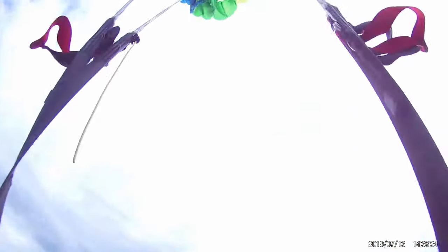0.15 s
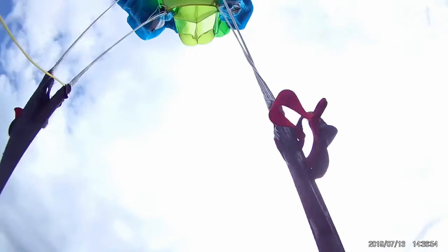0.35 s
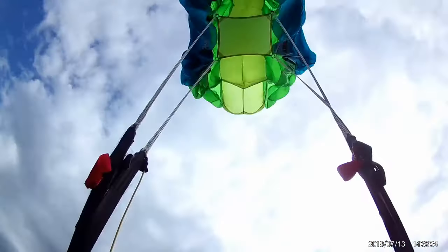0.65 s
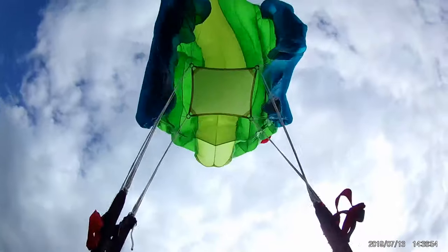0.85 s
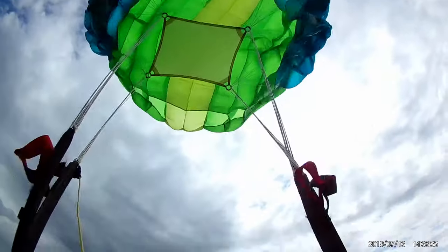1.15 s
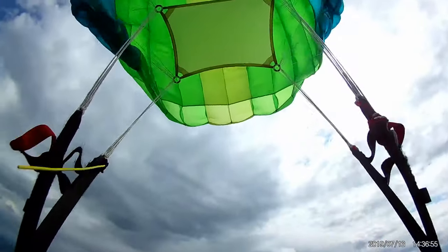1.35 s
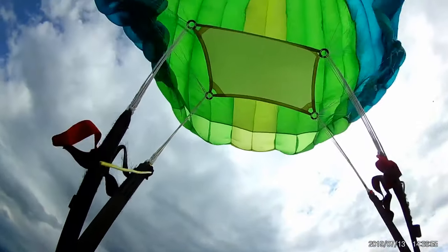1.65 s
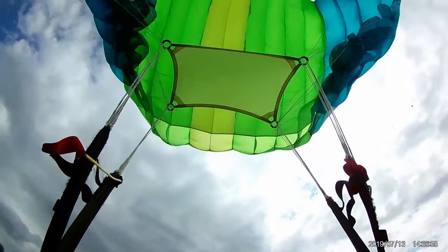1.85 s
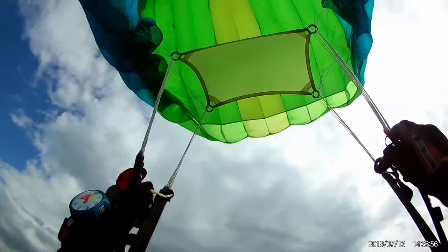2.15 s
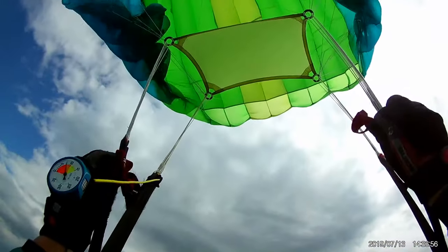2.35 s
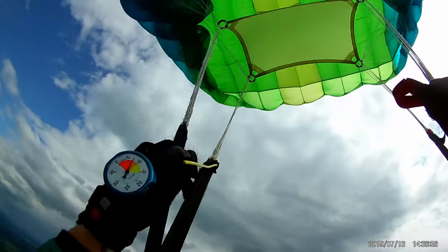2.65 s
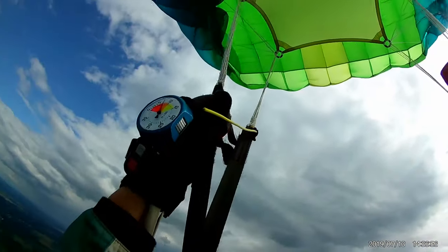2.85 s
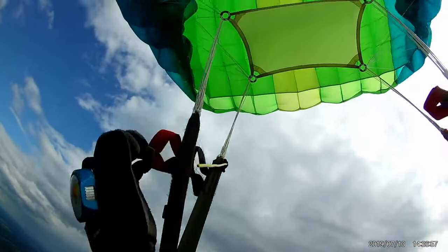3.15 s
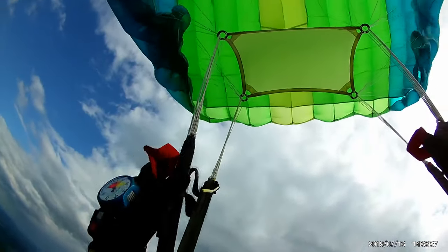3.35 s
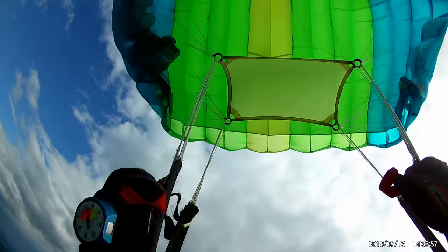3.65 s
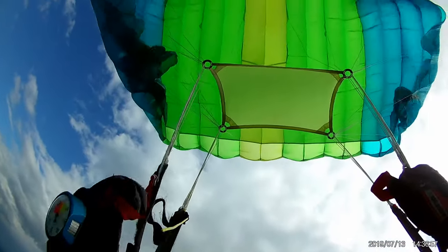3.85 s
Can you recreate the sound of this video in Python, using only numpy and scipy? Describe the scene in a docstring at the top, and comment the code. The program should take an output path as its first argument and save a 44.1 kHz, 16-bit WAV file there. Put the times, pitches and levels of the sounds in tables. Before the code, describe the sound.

Loud wind roars on a helmet microphone and dies within a quarter second as a parachute opens, with a sharp fabric snap at 0.1 seconds. The cloth flaps, jerks taut again around 0.6 seconds, and flutters faintly until about 2 seconds. Low buffeting thumps gradually thin out. From about 1.6 seconds a quieter, steady airstream continues to the end at 4 seconds, with a faint whistle from the cords.

```python
"""A ragged blast of free-fall wind roars at a helmet camera and dies within a quarter second as a
parachute opens. The filling canopy flutters, cracks and twice jerks taut. Eddies strike the microphone
as low thumps, thinning as the fall slows, and a steady airstream rings the resonances of the housing.
As the cloth spreads, air sounds a hollow in the gear; then the lines sing softly over a faint
flickering hiss."""
import sys
import numpy as np
from scipy.fft import rfft, irfft, next_fast_len
from scipy.io import wavfile
from scipy.ndimage import map_coordinates

SR = 44100
rng = np.random.default_rng(int(sys.argv[2]) if len(sys.argv) > 2 else 0)


def master_out(mix):
    """Clip the mix to full scale and print it as 16-bit PCM to the path in sys.argv[1]."""
    frames = np.transpose(np.atleast_2d(mix))
    ceiling = np.clip(frames, -1, 1)
    pcm = np.round(ceiling * 32767).astype(np.int16)
    wavfile.write(sys.argv[1], SR, pcm)


N = 176400

# resonances of the housing, and one that the blast drives harder: centre_hz, width_hz, gain_db
HOUSING_MODES = [(206, 22, -16), (368.6, 36, -3), (422, 34, -19), (509, 41, -6.5), (647.3, 27, 1.5),
                 (894, 37, -6), (1150, 20, -12), (1302, 55, -3), (1447, 14, -1.5), (1716, 36, -6.5),
                 (1890, 51, 1), (2860, 55, -12)]
BLAST_MODES = [(363.5, 14, 1.5)]
# envelopes of the blast, the buffeting and the cavity tone: time_s, relative_level_db
BLAST_LEVEL = [(0, -9), (.06, -13.5), (.09, -9.5), (.14, -14.5), (.185, -23.5), (.205, -22), (.235, -36.5),
               (.4, -68)]
BUFFET_LEVEL = [(0, -3.5), (.07, -16.5), (.2, -11.5), (.3, -17), (.52, -18), (.59, -23.5), (.68, -22),
                (.75, -28.5), (.95, -31.5), (1.12, -28), (1.23, -34), (1.39, -30.5), (1.75, -33.5),
                (2.05, -32), (2.22, -35.5), (2.62, -34), (2.8, -37.5), (3.7, -36.5), (4.0, -35.5)]
HOLLOW_LEVEL = [(.85, -57.5), (1.03, -63), (1.08, -54), (1.2, -54), (1.275, -44), (1.33, -44), (1.4, -60),
                (1.6, -70)]
# envelopes of the airstream's two bands: time_s, relative_rush_db, relative_hiss_db
STREAM_LEVELS = [(0, -36, -24.5), (.3, -25.5, -33.5), (.41, -35, -36.5), (.48, -24.5, -36.5),
                 (.57, -32.5, -35), (.64, -31, -32), (.76, -36.5, -38.5), (.88, -35, -37), (.98, -41, -40),
                 (1.08, -38.5, -35), (1.23, -42.5, -35.5), (1.35, -35, -38), (1.42, -36.5, -39),
                 (1.6, -37, -37.5), (1.64, -44.5, -44), (1.7, -47, -47.5), (1.82, -46.5, -46),
                 (1.87, -40.5, -41.5), (2.06, -39.5, -41), (2.15, -43, -44.5), (2.3, -43, -45.5),
                 (2.48, -41, -40.5), (2.78, -43.5, -44.5), (2.87, -41.5, -42), (3.15, -40, -41.5),
                 (3.3, -43, -44), (3.5, -41, -42.5), (3.68, -45, -46.5), (4.0, -47, -48.5)]
# noise spectra ahead of the housing: frequency_hz, relative_density_db
BLAST_SPECTRUM = [(70, -20.5), (140, -3), (200, -0.5), (290, -3.5), (450, -3.5), (620, -13), (1000, -10.5),
                  (1290, -9), (1600, -11.5), (2000, -15), (2600, -25), (3000, -22.5), (3900, -26.5),
                  (4900, -38.5), (6000, -33), (7300, -45.5), (9300, -52), (11000, -64.5)]
BUFFET_SPECTRUM = [(12, -30), (25, -13), (42, -9), (68, 0.5), (95, -7), (130, -12), (200, -25.5),
                   (400, -36), (900, -103.5)]
CRACK_SPECTRUM = [(60, -9.5), (200, 4.5), (380, 3), (800, -12), (1350, -4), (2000, -9.5), (2600, -18.5),
                  (3800, -18.5), (5000, -30.5), (6500, -32), (8000, -59.5), (10000, -68.5)]
FLICKER_SPECTRUM = [(2500, -28), (4000, 3), (6000, 4), (7400, -19.5), (9000, -2), (11000, -31)]
# airstream spectra before and after the canopy spreads: frequency_hz, relative_density_db
RUSH_EARLY = [(70, -33), (150, 8.5), (220, 2), (290, 1), (360, 0.5), (480, -0.5), (560, -7.5), (680, -10.5),
              (800, -11.5), (1100, -24), (2000, -76)]
RUSH_LATE = [(70, -21), (150, 3), (220, 0), (290, -1), (360, -1), (490, 1), (560, -4.5), (650, -2),
             (780, -6.5), (1000, -18.5), (2000, -54.5)]
HISS_EARLY = [(450, -31), (800, -11.5), (1050, -8.5), (1300, -0.5), (1500, -9.5), (1900, -7.5), (2250, -7),
              (2600, -23), (3080, -11.5), (3500, -25), (3900, -17), (4900, -29.5), (5900, -31), (7200, -45),
              (8200, -67.5), (11000, -69.5)]
HISS_LATE = [(450, -27), (800, -9), (1000, -10), (1300, 0), (1600, -4.5), (1950, -5), (2200, -9),
             (2600, -20), (3080, -10), (3550, -18.5), (4100, -19.5), (4500, -28.5), (5200, -31),
             (5900, -21.5), (6600, -34), (7200, -30.5), (8000, -62), (11000, -69.5)]
# big eddies striking the microphone: start_s, envelope_peak_db, pitch_hz
EDDY_THUMPS = [(.002, -2.5, 67), (.16, -7, 67), (0.327, -11.5, 56), (0.368, -4, 84.5), (.478, -15, 102),
               (0.64, -9, 68.6), (0.664, -12.5, 68.5), (.806, -18.5, 76), (0.883, -13.5, 66),
               (0.912, -19.5, 65), (1.051, -20, 83), (1.278, -16.5, 65), (1.337, -22, 78.4),
               (1.44, -25, 76), (1.508, -18.5, 72), (1.598, -23, 64.6), (1.68, -27, 83), (1.755, -30.5, 55),
               (1.948, -26, 77.5), (2.031, -31, 69), (2.3, -32, 97), (2.521, -27, 78), (2.598, -38, 72),
               (2.646, -24, 78), (3.95, -27.5, 75)]
# flaps of the filling canopy: peak_s, level_db, rise_s, decay_s
CANOPY_CRACKS = [(0.094, -14, 0.011, 0.0097), (.174, -13.5, 0.0021, 0.0032), (0.206, -17, 0.0044, .012),
                 (0.268, -25, .009, 0.0074), (.32, -36, 0.0052, 0.0093), (0.38, -27.5, 0.0079, 0.0098),
                 (0.475, -27.5, 0.01, 0.018), (0.633, -22.5, .011, 0.012), (.693, -27, 0.0076, 0.009),
                 (1.123, -38.5, 0.0028, 0.013), (1.283, -29, 0.0026, 0.0072), (1.792, -32, 0.0014, 0.0089),
                 (1.873, -35.5, 0.0066, 0.016)]
# pressure pulses as the cloth jerks fully taut: start_s, peak_db
CANOPY_SNAPS = [(0.0881, 0), (.632, -13.5)]
# whistles of the taut suspension lines: pitch_hz, half_width_hz, level_re_hiss_db
LINE_TONES = [(2080, 5.4, -17.5), (3700, 12, -33), (4920, 40, -33.5)]
# spectral shape of the stereo side signal: frequency_hz, gain_db
SIDE_SPECTRUM = [(150, -78), (400, -52.5), (750, -23), (1400, -22.5), (4000, -25), (7000, -28.5)]
# further gain on the side signal, falling as the air slows: time_s, gain_db
SIDE_FADE = [(0, -4.5), (.25, 2.5), (.7, -4), (1.3, -13), (1.7, -15), (2.3, -30)]

SPREAD_START_S, SPREAD_END_S = 1.08, 1.81  # the canopy spreads
FLUTTER_HZ, FLUTTER_DB, RIPPLE_HZ, RIPPLE_DB = 53.4, 0.52, 194.9, 1.15  # flapping cloth, finer ripple


def amp(db):
    """Amplitude ratio of a level in decibels."""
    return 10 ** (np.asarray(db) / 20)


def unit(x):
    """Normalisation to an rms of 1."""
    return x / np.sqrt(np.mean(x ** 2) + 1e-20)


def gain_at(spectrum, hz):
    """Amplitude response, interpolated in decibels on a logarithmic frequency axis."""
    points_hz, points_db = np.transpose(spectrum)
    return amp(np.interp(np.log(hz + 1), np.log(points_hz + 1), points_db))


def curves(rows):
    """Linear interpolation, sample by sample, of each column after the time."""
    times_s, *columns = np.transpose(rows)
    return [np.interp(np.arange(N) / SR, times_s, column) for column in columns]


def wobble(rate_hz):
    """Smooth random modulation: a spline through rate_hz Gaussian values a second."""
    return map_coordinates(rng.standard_normal(4096), [np.arange(N) * rate_hz / SR], mode="mirror")


def pulse(u):
    """A smooth pulse that rises from 0, peaks at u = 1 and decays."""
    return (u * np.exp(1 - u)) ** 2


def filtered(x, response):
    """Linear filtering: the spectrum of x is multiplied by a frequency response."""
    size = next_fast_len(N + SR // 2)
    return irfft(rfft(x, size) * response(np.fft.rfftfreq(size, 1 / SR)), size)[..., :N]


def ringing(x, modes):
    """Forced resonance: the responses of damped modes add to the sound that drives them."""
    def response(hz):
        return 1 + sum(amp(db) * 1j * hz * width / (centre ** 2 - hz ** 2 + 1j * hz * width)
                       for centre, width, db in modes)
    return filtered(x, response)


def turbulence(spectrum):
    """Random pressure of rms 1, coloured by its spectrum and by resonance in the housing."""
    noise = filtered(rng.standard_normal(N), lambda hz: gain_at(spectrum, hz))
    return unit(ringing(noise, HOUSING_MODES))


def free_fall_blast():
    """Turbulent noise falls with airspeed, so the ragged roar collapses as the canopy catches."""
    level_db, = curves(BLAST_LEVEL)
    roughness = amp(2.3 * wobble(170))
    return amp(level_db) * unit(roughness * ringing(turbulence(BLAST_SPECTRUM), BLAST_MODES))


def buffeting():
    """Pressure fluctuations of eddies on the microphone make a rumble, mostly below 140 Hz."""
    level_db, = curves(BUFFET_LEVEL)
    unevenness = amp(0.14 * wobble(20))
    return amp(level_db - 1.63) * unit(unevenness * turbulence(BUFFET_SPECTRUM))


def airstream(rush_db, hiss_db, spread):
    """Amplitude modulation by the fluttering cloth is common to low rush, hiss and singing lines."""
    def crossfade(early, late):  # equal power
        return np.sqrt(1 - spread) * turbulence(early) + np.sqrt(spread) * turbulence(late)
    flutter = unit(amp(FLUTTER_DB * wobble(FLUTTER_HZ) + RIPPLE_DB * wobble(RIPPLE_HZ)))
    rush = amp(rush_db - 1.02 + 0.56 * wobble(29.4)) * crossfade(RUSH_EARLY, RUSH_LATE)
    hiss_gain = amp(hiss_db - 2.5 + 0.12 * wobble(23.8))
    hiss = hiss_gain * (crossfade(HISS_EARLY, HISS_LATE) + spread * singing_lines())
    return flutter * (rush + hiss)


def eddy_thumps(rise_s=0.011):
    """Each big eddy is a pressure transient that swells and dies within a few low cycles."""
    out = np.zeros(N + SR)
    t = np.arange(SR // 5) / SR
    envelope = pulse(t / rise_s)
    for start_s, peak_db, pitch_hz in EDDY_THUMPS:
        out[round(start_s * SR):][:len(t)] += amp(peak_db) * envelope * np.sin(2 * np.pi * pitch_hz * t)
    return out[:N]


def canopy_cracks(roughness_db=3.5):
    """Accelerating cloth radiates: each flap is a noise burst with exponential rise and decay."""
    t = np.arange(N) / SR
    envelope = sum(amp(level_db) * np.exp(-np.maximum((peak_s - t) / rise_s, (t - peak_s) / decay_s))
                   for peak_s, level_db, rise_s, decay_s in CANOPY_CRACKS)
    roughness = amp(roughness_db * np.tanh(wobble(320)))
    return envelope * unit(roughness * turbulence(CRACK_SPECTRUM))


def canopy_snaps(rise_s=0.0008):
    """Impulse excitation: cloth jerking taut sends out a pressure pulse that rings the housing."""
    t = np.arange(N) / SR
    pressure = sum(amp(peak_db) * pulse(np.maximum(t - start_s, 0) / rise_s)
                   for start_s, peak_db in CANOPY_SNAPS)
    return ringing(pressure, HOUSING_MODES)


def hollow_tone(pitch_hz=1315, wander_hz=19.4, jitter_hz=35):
    """Cavity tone: air crossing a hollow in the gear sounds a hoarse note that wanders with the flow."""
    level_db, = curves(HOLLOW_LEVEL)
    hz = pitch_hz + wander_hz * wobble(14) + jitter_hz * wobble(220)
    phase = 2 * np.pi * np.cumsum(hz) / SR
    hoarseness = amp(1.7 * wobble(90))
    return amp(level_db) * unit(hoarseness * np.sin(phase))


def singing_lines():
    """Aeolian tones: air passing the taut cords whistles unsteadily in narrow bands of noise."""
    def whistle(pitch_hz, half_width_hz):
        noise = rng.standard_normal(N)
        return unit(filtered(noise, lambda hz: 1 / (1 + ((hz - pitch_hz) / half_width_hz) ** 2)))
    return sum(amp(db) * whistle(pitch_hz, half_width_hz) for pitch_hz, half_width_hz, db in LINE_TONES)


def treble_flicker(hiss_db, spread, offset_db=-34.5):
    """Random amplitude modulation: a faint high hiss flickers in grainy patches."""
    patches = amp(wobble(24) + 3 * wobble(310))
    return np.sqrt(spread) * amp(hiss_db + offset_db) * unit(patches * turbulence(FLICKER_SPECTRUM))


def scene():
    """Superposition at one microphone; a weak side signal leans the treble right in the fast air."""
    rush_db, hiss_db = curves(STREAM_LEVELS)
    spread, = curves([(SPREAD_START_S, 0), (SPREAD_END_S, 1)])
    mid = free_fall_blast() + buffeting() + airstream(rush_db, hiss_db, spread) + eddy_thumps()
    mid += canopy_cracks() + canopy_snaps() + hollow_tone() + treble_flicker(hiss_db, spread)
    fade_db, = curves(SIDE_FADE)
    waver = 1 + 0.84 * wobble(60.7)
    side = amp(fade_db) * filtered(mid * waver, lambda hz: gain_at(SIDE_SPECTRUM, hz))
    return np.array([mid - side, mid + side])


def record(dry, ceiling=2.1, cutoff_hz=11200):
    """Soft saturation in the camera rounds the highest peaks; a low-pass filter limits the band."""
    rounded = dry / (1 + np.abs(dry / ceiling) ** 8) ** (1 / 8)
    return filtered(rounded, lambda hz: hz < cutoff_hz)


dry = scene()
out = record(dry)
master_out(out)
```